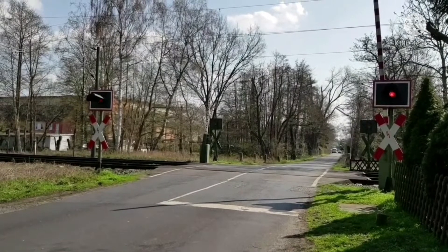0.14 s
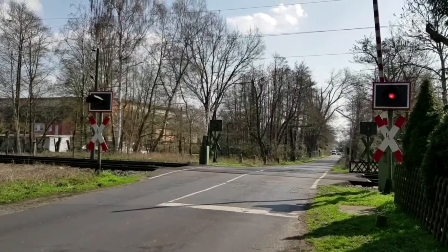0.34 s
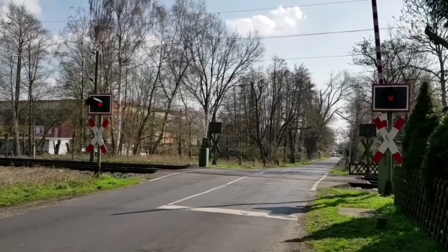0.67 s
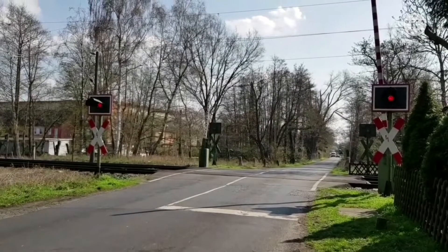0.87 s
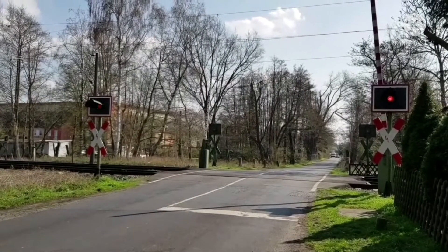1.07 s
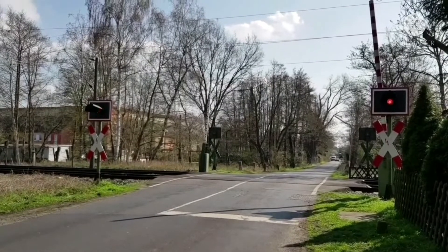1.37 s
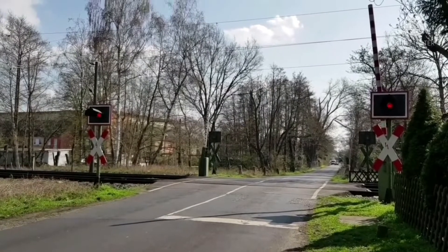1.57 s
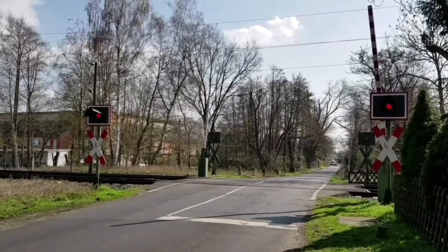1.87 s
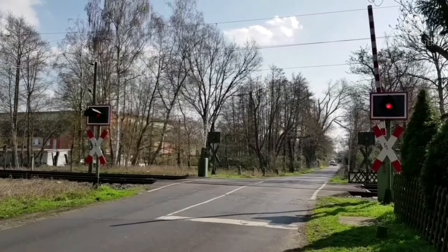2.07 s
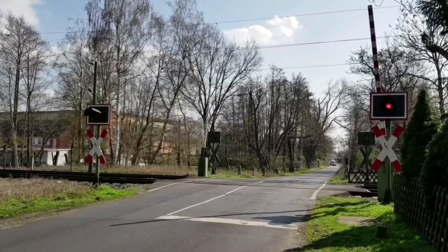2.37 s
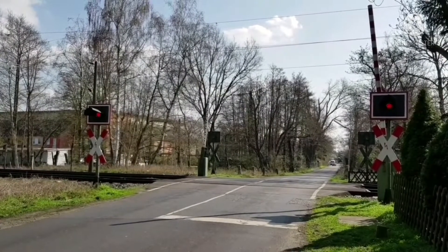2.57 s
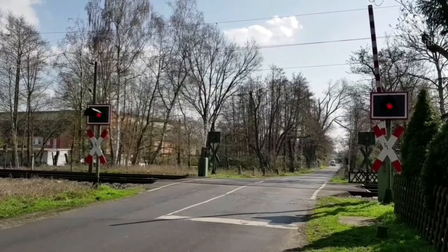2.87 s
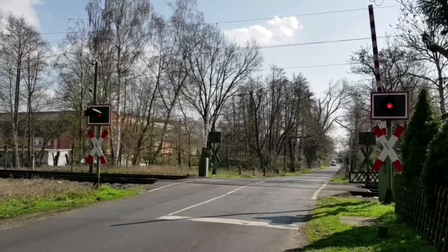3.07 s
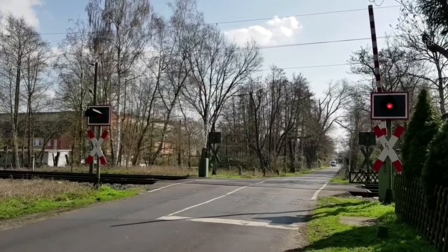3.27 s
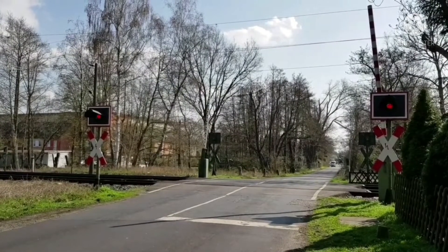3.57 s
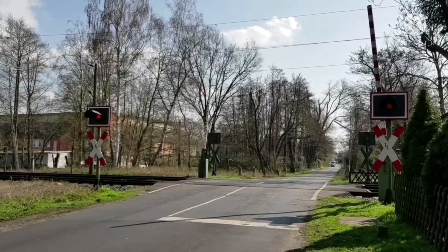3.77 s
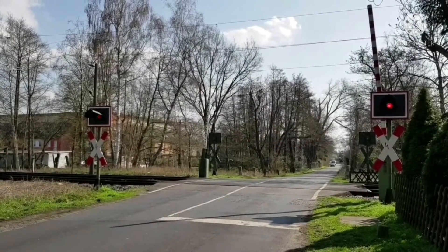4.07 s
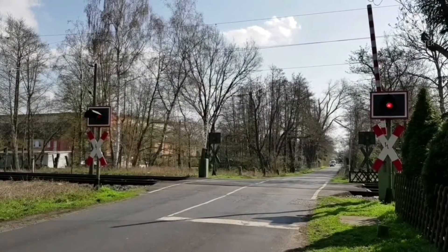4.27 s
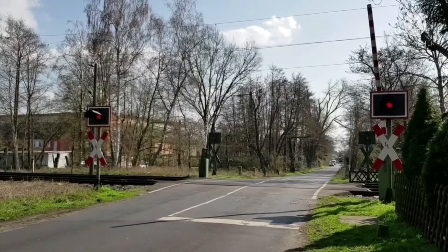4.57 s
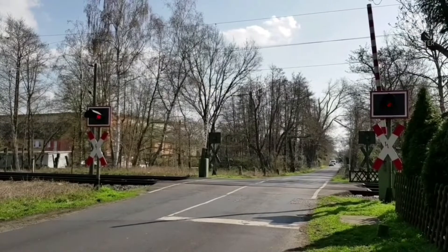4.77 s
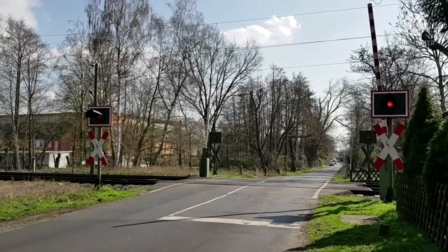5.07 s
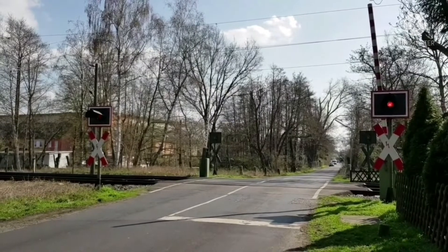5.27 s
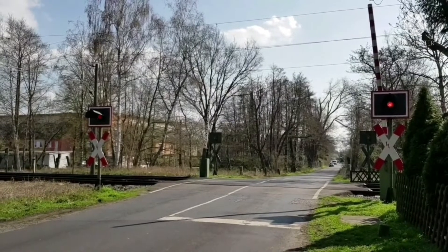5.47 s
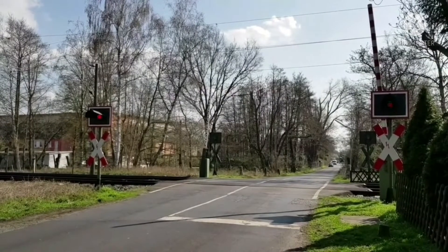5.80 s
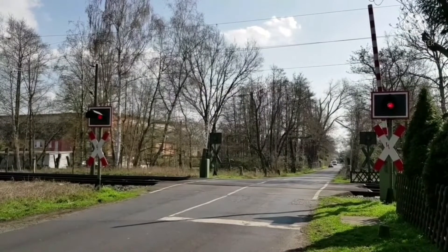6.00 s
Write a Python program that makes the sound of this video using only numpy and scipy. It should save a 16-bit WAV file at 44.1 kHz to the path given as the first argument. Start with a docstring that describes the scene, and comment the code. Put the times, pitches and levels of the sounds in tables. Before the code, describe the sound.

A hand-held stereo camera catches a quiet roadside among trees. A hard plastic knock comes almost at once over a departing car's deep drone and road noise. A bird steps down in high slurs, then a warbler alternates swooping syllables. Midway come clicks, grip bumps and brief finger rubbing as the engine drops away; birdsong and faint hiss continue, broken by another loud knock and a lighter one.

```python
"""A car's engine drones and dies away at a country level crossing, while its road noise recedes.
The engine is a few gliding harmonics; tyres, breeze and hiss are coloured stereo noise.
Close, dry knocks and clicks ring the modes of a hand-held camera's case, and fingers rub it.
Songbirds call from the trees as gliding tones, echoed by a house front and the wood."""
import sys
import numpy as np
from scipy import signal
from scipy.io import wavfile
from scipy.ndimage import uniform_filter1d

SR = 44100
rng = np.random.default_rng(int(sys.argv[2]) if len(sys.argv) > 2 else 0)


def waveform_to_disk(signal):
    """Save audio, clipped to [-1, 1], as 16-bit WAV at the path in sys.argv[1]."""
    frames = np.transpose(np.atleast_2d(signal))
    scaled = np.clip(frames, -1, 1) * 32767
    samples = np.round(scaled).astype(np.int16)
    wavfile.write(sys.argv[1], SR, samples)


N = 270765
TIME = np.arange(N) / SR
FRAME = 2048  # noise frame, samples

# Levels are relative where a layer adds its own trim. Pan is left minus right.
# engine before its run-down: t/s, firing rate f/Hz, firing tone level/dB before trim
ENGINE_RUN = [(0.0, 61.5, -46.5), (0.12, 61.2, -37.5), (0.16, 60.5, -50.5), (0.47, 61.64, -45),
              (0.61, 59.8, -42.5), (0.92, 59.98, -44), (1.26, 55.97, -41), (1.54, 55.44, -40),
              (2.35, 56.06, -44), (2.56, 53.15, -38), (3.26, 52.88, -45), (3.55, 53.9, -42)]
# exhaust harmonics: multiple of the firing rate, relative level/dB
EXHAUST_ORDERS = [(1, 0.5), (2, -11.5), (3, -24), (4, -24.5)]
# shared level of the harmonics above the firing tone: t/s, added level/dB
OVERTONE_LEVEL = [(0, 2), (.6, 3), (1.2, 2), (2.2, 0.8), (2.7, -7.5), (3.5, 6)]
# car on the road, before trim: t/s, body rumble level/dB, tyre roar level/dB
ROAD_LEVELS = [(0.0, -53.5, -58.5), (0.61, -52.5, -60), (1.13, -52.5, -58.5), (1.81, -55, -62),
               (3.54, -57, -62.5), (3.85, -62.5, -65.5), (4.7, -61.5, -65.5), (6.14, -65, -64.5)]
# colour of the body rumble: f/Hz, relative density/dB
RUMBLE_COLOUR = [(28, 0), (42, 3), (85, 5.5), (140, 1), (230, 0.5), (320, -1.5), (430, -11.5), (600, -11),
                 (1200, -70)]
# colour of the tyre roar: f/Hz, relative density/dB
TYRE_COLOUR = [(200, -3), (400, -4.5), (560, -4), (730, 2.5), (880, -2.5), (1100, -2.5), (1400, -8),
               (1650, -12.5), (2000, -17), (2600, -21), (3400, -33.5), (7000, -69)]

# knocks on the case: t/s, peak level/dB before pan, pan/dB, contact sharpness f/Hz, ring length factor
CASE_KNOCKS = [(0.1593, -14.5, 10.5, 1140, 1.2), (0.4357, -30, 9.5, 1929, 0.6),
               (0.8769, -38.5, -2, 1400, 0.54), (3.4449, -40, -18, 1130, 0.46),
               (3.4512, -38, -10, 722, 1.9), (3.572, -30, 12, 770, 1), (3.661, -40.5, -6, 835, 0.96),
               (4.598, -12.5, 10, 2170, 1.3), (5.2929, -34.5, 19, 880, 1.24)]
# soft bumps of the grip: t/s, starting level/dB, f/Hz, t60/s
GRIP_BUMPS = [(3.448, -50, 176, 0.11), (3.663, -37.5, 47.2, 0.11), (3.662, -41, 125, .05),
              (4.063, -41, 47, 0.15), (5.306, -34, 64, 0.086)]
# ringing modes of the case: left f/Hz, relative level/dB, t60/s before the length factor, signed right gain
CASE_MODES = [(211, -11, 0.13, 0.56), (295, 1, 0.034, 0.81), (368, 6.5, 0.024, -0.59),
              (523, -6.5, 0.02, -0.38), (713, 0.2, 0.019, 0.68), (947, -5, 0.027, -0.45),
              (1140, -7.5, 0.011, 1.8), (1770, -6.5, 0.015, -0.44), (2291, -17, 0.011, 0.8),
              (3900, -16, 0.023, -0.087), (5200, -8, 0.013, 0.58), (6160, 0, 0.0098, -0.21)]
# clicks of a plastic catch: t/s, peak level/dB before pan, pan/dB, contact sharpness f/Hz, ring length factor
CATCH_CLICKS = [(.4252, -37, -10, 1686, 1.3), (.4353, -35.5, 6, 1390, 1.2), (.4720, -43, 14, 5040, 0.37),
                (3.4436, -47.5, -17, 7110, 0.69), (3.5716, -20, 8.5, 7830, 1.7),
                (5.2922, -49.5, 15, 3690, 2)]
# ringing modes of the catch: left f/Hz, relative level/dB, t60/s before the length factor, signed right gain
CATCH_MODES = [(1060, -8.5, 0.032, 0.91), (1670, 6.5, 0.0057, -1.24), (2260, 11, 0.0039, 1),
               (2980, 0, 0.0066, -0.57), (4020, 2, 0.0099, -0.32), (6580, 14, 0.0068, -0.64),
               (9900, 6, 0.007, -0.26)]
# fingers rubbing the case: t/s, level/dB
FINGER_RUBS = [(3.447, -57), (3.578, -59)]
# colour of the rubbing: f/Hz, relative density/dB
RUB_COLOUR = [(450, 10), (950, -1), (3000, 2.5), (4000, -6), (6200, 4), (8000, -24)]

# the warbler's low syllable: t/s, length/s, pitch f/Hz, level/dB, echo level/dB relative to the note, pan/dB
LOW_NOTES = [(2.566, 0.09, 3860, -68.5, 4, 3), (3.407, 0.073, 3862, -69, -2, 5),
             (3.700, 0.081, 3820, -64, 5.5, 1.5), (4.753, 0.068, 3790, -68, 12, 2.5)]
# the warbler's high syllable: t/s, length/s, pitch f/Hz, level/dB, echo level/dB relative to the note, pan/dB
HIGH_NOTES = [(2.956, 0.081, 4920, -63.5, 2.5, -1), (4.088, 0.08, 4960, -56.5, -3, 0),
              (5.133, .082, 4870, -63, -2, 0.29)]
# the warbler's top syllable: t/s, length/s, pitch f/Hz, level/dB, echo level/dB relative to the note, pan/dB
TOP_NOTES = [(3.303, .062, 5390, -57.5, -8, -1), (4.391, 0.058, 5290, -55, -1, -0.5)]
# a far bird's rising whistles: t/s, pitch f/Hz, level/dB
FAR_WHISTLES = [(0.191, 2536, -71.5), (.722, 2659, -74.5), (1.235, 2600, -73), (1.825, 2645, -73),
                (2.336, 2630, -69.5), (2.888, 2710, -76.5), (3.534, 2720, -73), (4.421, 2550, -70.5),
                (5.041, 2700, -71), (5.588, 2670, -70)]
# another bird's thin, swelling notes: t/s, length/s, level/dB
FAR_PIPES = [(2.632, .13, -77), (2.989, 0.2, -74.5), (3.426, 0.146, -71), (3.822, 0.15, -71.5),
             (4.274, 0.14, -73.5)]
# faint chirps, and (4.922 s) a late echo of the warbler's low syllable: t/s, pitch f/Hz, level/dB
FAINT_NOTES = [(0.271, 4600, -85), (1.04, 6200, -87), (1.32, 4760, -77), (2.221, 5490, -79),
               (2.289, 4620, -79), (4.53, 3700, -79), (4.922, 3850, -78)]
# bursts of twitter deep in the wood: t/s, length/s, centre pitch f/Hz, level/dB
TWITTER_BURSTS = [(0.154, 0.084, 6330, -85.5), (2.632, 0.16, 5790, -82.5)]
# falling slur: share of the note, pitch ratio, loudness (0-1)
SLUR_SHAPE = [(0, 1.1, 0), (.14, 1.07, .75), (.5, 1.005, 1), (.78, .935, 1), (1, .8, .05)]
# rising whistle: share of the note, pitch ratio, loudness (0-1)
WHISTLE_SHAPE = [(0, .86, 0), (.2, .945, .8), (.5, 1.03, 1), (.82, 1.088, .9), (1, 1.095, 0)]
# nearly level, swelling pipe: share of the note, pitch ratio, loudness (0-1)
PIPE_SHAPE = [(0, 1.003, 0), (.12, 1, .5), (.45, 1, 1), (.85, 1, .9), (1, .997, 0)]
# slightly falling faint note: share of the note, pitch ratio, loudness (0-1)
FAINT_SHAPE = [(0, 1.02, 0), (.3, 1.005, 1), (.6, .99, .8), (1, .97, 0)]
# low syllable, a deep swoop: share of the note, pitch ratio, loudness (0-1)
LOW_SHAPE = [(0, 1.85, 0), (.06, 1.68, .22), (.17, 1.16, .45), (.29, 1.03, .6), (.6, .997, 1),
             (.8, .995, .8), (1, .95, 0)]
# high syllable, a shallower swoop: share of the note, pitch ratio, loudness (0-1)
HIGH_SHAPE = [(0, 1.48, 0), (.07, 1.32, .16), (.17, 1.08, .33), (.28, 1.01, .7), (.58, .995, 1),
              (.86, .935, 1), (1, .9, 0)]
# top syllable, a swoop and late drop: share of the note, pitch ratio, loudness (0-1)
TOP_SHAPE = [(0, 1.39, 0), (.08, 1.27, .25), (.2, 1.07, .45), (.34, 1, .9), (.5, 1, 1), (.78, 1, 1),
             (.88, .93, .2), (1, .8, .08)]

# colour of the breeze: f/Hz, relative density/dB
BREEZE_COLOUR = [(22, -38), (33, -29), (44, 22.5), (70, 11), (110, -16), (250, -31)]
# colour of the hiss: f/Hz, relative density/dB
HISS_COLOUR = [(1500, -4.5), (2600, 0.5), (3400, 3), (4500, -3.5), (6300, -7.5), (7300, -1), (8300, -41),
               (10000, -7), (12500, 1), (14500, -3)]
# likeness of left and right in every noise: f/Hz, coherence (0-1)
STEREO_LIKENESS = [(60, 0.76), (130, 0.81), (290, 0.9), (630, 0.51), (1380, 0.027), (3000, 0.013)]
# far-off ringing: t/s, gain; then f/Hz, relative density/dB
RING_SWELL = [(2.5, 0.37), (4.25, 1), (4.9, 0.94), (5.2, 0.53)]
RING_COLOUR = [(1300, -47), (1520, 1.0), (1620, -1.0), (1720, -1.5), (2000, -40.0)]
# haze of birdsong: t/s, gain; then f/Hz, relative density/dB
CHORUS_SWELL = [(0, 0.93), (3.5, 1), (5.5, 0.42)]
CHORUS_COLOUR = [(2800, -25), (4000, -2.0), (5600, 0.0), (6800, -7.0), (8000, -46)]

# the engine runs down, sagging steadily and fading ever faster
RUN_DOWN_AT_S, SAG_HZ_PER_S, FADE_DB_PER_S2 = 3.53, 33, 390
# after each knock the case settles with a weaker, duller, longer blow
REBOUND_S, REBOUND_DB, REBOUND_HZ, REBOUND_RING = 0.0118, -18.5, 450, 1.7
# falling series: each slur is lower, longer, louder and further right than the last
SERIES_AT_S, SLUR_GAP_S = 1.183, 0.118
SLUR_HZ, SLUR_STEP_HZ, SLUR_S, SLUR_STEP_S = 6837, -320, 0.052, 0.013
SLUR_DB, SLUR_STEP_DB, SLUR_PAN_DB, SLUR_PAN_STEP_DB = -57, 1.83, 8.5, -2
# what the notes of each far layer share
WHISTLE_S, WHISTLE_ECHO_DB, WHISTLE_PAN_DB = 0.105, -12.5, -4.5
PIPE_HZ, PIPE_ECHO_DB, PIPE_PAN_DB = 3983, -10.5, 7
FAINT_S, FAINT_ECHO_DB, FAINT_PAN_DB = 0.0906, -14, 3
WALL_DULL_HZ = 5600
TWIG_TILT_DB_PER_OCTAVE = 19
TOP_HZ = 14550


def undb(db):
    """Decibels to gain."""
    return 10 ** (np.asarray(db) / 20)


def unit(x):
    """Scale to rms 1."""
    return x / np.sqrt(np.mean(x ** 2))


def curve(table, at=TIME):
    """Each column of a table, joined by straight lines."""
    s, *columns = np.transpose(table)
    return [np.interp(at, s, column) for column in columns]


def colour(table, hz):
    """Read (f/Hz, value) points on a log-frequency axis."""
    f, value = np.transpose(table)
    return np.interp(np.log(hz + 1), np.log(f), value)


def walk(rate):
    """Smooth random drift of rms 1, from about rate random points a second."""
    return unit(signal.resample(rng.standard_normal(int(rate * N / SR) + 2), N))


def add(out, s, sound, pan_db):
    """Mix a sound in at a time and a place between left and right."""
    i = int(s * SR)
    sides = undb(np.array([[pan_db], [-pan_db]]) / 2)
    out[:, i:i + sound.shape[-1]] += (sides * sound)[:, :N - i]


def wash(spectrum, flicker_db):
    """Coloured stereo noise: time-frequency patches flicker, and the bass is alike on both sides."""
    hz = np.fft.rfftfreq(FRAME, 1 / SR)
    shape = (len(hz), 2 * N // FRAME + 3)
    mid, side = rng.standard_normal((2, *shape)) + 1j * rng.standard_normal((2, *shape))
    alike = np.clip(colour(STEREO_LIKENESS, hz), 0, 1)[:, None]
    patches = uniform_filter1d(rng.standard_normal(shape), size=12, axis=0)
    patches = unit(uniform_filter1d(patches, size=4, axis=1))
    gain = undb(colour(spectrum, hz)[:, None] + flicker_db * patches)
    # more sum than difference makes the sides coherent
    mid = signal.istft(mid * np.sqrt(1 + alike) * gain)[1][:N]
    side = signal.istft(side * np.sqrt(1 - alike) * gain)[1][:N]
    return np.array([mid + side, mid - side]) / np.std(mid)


def engine(flutter=0.014, uneven_db=2.0, trim_db=-1.5):
    """Muffled exhaust: a strong firing tone with weaker, unsteady overtones, dying away at the end."""
    hz, db = curve(ENGINE_RUN)
    dying = np.maximum(TIME - RUN_DOWN_AT_S, 0)
    hz = np.maximum(hz - SAG_HZ_PER_S * dying, 0)
    db = db + trim_db - FADE_DB_PER_S2 * dying ** 2
    phase = 2 * np.pi * np.cumsum(hz * (1 + flutter * walk(25))) / SR
    overtones, = curve(OVERTONE_LEVEL)
    tone = np.zeros(N)
    for order, order_db in EXHAUST_ORDERS:
        # zero for the firing tone, one for the overtones
        is_overtone = min(abs(order - 1), 1)
        order_level = order_db + is_overtone * (overtones + uneven_db * walk(9.07))
        tone += undb(order_level) * np.sin(order * phase)
    return np.sqrt(2) * tone * undb(db)


def road(rumble_db=4, tyre_db=2):
    """Body rumble and tyre roar of the receding car, as two bands of noise on falling faders."""
    rumble, roar = curve(ROAD_LEVELS)
    body = undb(rumble + rumble_db) * wash(RUMBLE_COLOUR, flicker_db=2.5)
    tyres = undb(roar + tyre_db) * wash(TYRE_COLOUR, flicker_db=1.5)
    return body + tyres


def strikes(hits, modes, right_tune, crack_db, crack_t60):
    """Blows ring a small plastic body; the right microphone hears each mode lower, with its own gain and sign."""
    out, t = np.zeros((2, N)), np.arange(SR // 4) / SR
    tune = np.array([[1], [right_tune]])
    muffle = signal.butter(6, 7000, fs=SR, output="sos")
    for s, db, pan_db, sharp_hz, length in hits:
        ring = np.zeros((2, len(t)))
        for hz, mode_db, t60, right in modes:
            decay = undb(mode_db - 60 * t / (t60 * length))
            ring += np.array([[1], [right]]) * decay * np.sin(2 * np.pi * hz * tune * t)
        crack = undb(crack_db - 60 * t / (crack_t60 * length)) * rng.standard_normal((2, len(t)))
        raw = ring + crack
        # a softer contact pushes for longer and dulls the blow
        contact = signal.butter(2, min(sharp_hz, SR / 3), fs=SR, output="sos")
        blow = signal.sosfilt(contact, raw) + 0.045 * raw
        # the body lets less through above 7 kHz
        blow = signal.sosfilt(muffle, blow) + 0.14 * blow
        peak = np.abs(blow).max(axis=1, keepdims=True)
        add(out, s, -undb(db) * blow / peak, pan_db)
    return out


def handling():
    """Knocks with their rebounds, catch clicks, and soft low bumps of the hand as decaying sines."""
    rebounds = [(s + REBOUND_S, db + REBOUND_DB, pan_db, REBOUND_HZ, length * REBOUND_RING)
                for s, db, pan_db, _, length in CASE_KNOCKS]
    out = strikes(CASE_KNOCKS + rebounds, CASE_MODES, right_tune=0.908, crack_db=-22, crack_t60=0.22)
    out += strikes(CATCH_CLICKS, CATCH_MODES, right_tune=0.87, crack_db=-1, crack_t60=0.02)
    t = np.arange(SR // 2) / SR
    for s, db, hz, t60 in GRIP_BUMPS:
        add(out, s, undb(db - 60 * t / t60) * np.sin(2 * np.pi * hz * t), 0)
    return out


def rubbing(attack_s=0.0066, t60=0.31):
    """Fingers slide briefly over the case as the grip shifts: quick-rising, decaying noise."""
    level = np.zeros(N)
    for s, db in FINGER_RUBS:
        since = np.maximum(TIME - s, 0)
        level += np.minimum(since / attack_s, 1) * undb(db - 60 * since / t60)
    return level * wash(RUB_COLOUR, flicker_db=5)


def scatter(sound, t60, build_s=0.00063):
    """Dense faint reflections, different for each side, that build up and decay at the t60 rate."""
    t = np.arange(SR) / SR
    tail = rng.standard_normal((2, SR)) * np.minimum(t / build_s, 1) * undb(-60 * t / t60)
    tail /= np.sqrt(np.sum(tail ** 2, axis=1, keepdims=True))
    return signal.fftconvolve(sound, tail, axes=1)[:, :N]


def bird(notes, shape, echo_s, twig_db, wood_db, wood_t60, waver, shimmer_db):
    """Gliding, unsteady notes; a house front slaps them back dully, twigs and wood scatter their highest parts."""
    out, scattered = np.zeros((2, 2, N))
    for s, length, hz, db, echo_db, pan_db in notes:
        n = int(length * SR)
        ratio, loud = curve(shape, np.linspace(0, 1, n))
        tremble, shimmer = rng.standard_normal((2, SR // 2))
        tremble = unit(uniform_filter1d(tremble, size=120))[:n]
        shimmer = unit(uniform_filter1d(uniform_filter1d(shimmer, size=400), size=300))[:n]
        phase = 2 * np.pi * np.cumsum(hz * ratio * (1 + waver * tremble)) / SR
        # at these short wavelengths the two microphones are about a quarter cycle apart
        pair = np.sqrt(2) * np.array([np.sin(phase), np.cos(phase)])
        note = undb(db + shimmer_db * shimmer) * loud * pair
        dull = np.minimum(max(WALL_DULL_HZ, hz) / (hz * ratio), 1) ** 4
        echo = note * dull * undb(echo_db)
        bright = undb(TWIG_TILT_DB_PER_OCTAVE * np.log2(ratio))
        for at, sound in (s, note), (s + echo_s, echo):
            add(out, at, sound, pan_db)
            add(scattered, at, sound * bright, pan_db)
    twigs = undb(twig_db) * scatter(scattered, t60=0.085)
    wood = undb(wood_db) * scatter(scattered, wood_t60, build_s=echo_s / 2)
    return out + twigs + wood


def falling_series(count=4, echo_db=-11.0):
    """A near bird steps down through a few high slurs, each one a downward glide."""
    notes = [(SERIES_AT_S + k * SLUR_GAP_S, SLUR_S + k * SLUR_STEP_S, SLUR_HZ + k * SLUR_STEP_HZ,
              SLUR_DB + k * SLUR_STEP_DB, echo_db, SLUR_PAN_DB + k * SLUR_PAN_STEP_DB)
             for k in range(count)]
    return bird(notes, SLUR_SHAPE, echo_s=0.048, twig_db=-3, wood_db=-2.5, wood_t60=0.36,
                waver=0.011, shimmer_db=2)


def warbler():
    """A warbler see-saws between three syllables, each swooping down onto a held pitch."""
    low = bird(LOW_NOTES, LOW_SHAPE, echo_s=0.061, twig_db=-8, wood_db=-8, wood_t60=0.33,
               waver=0.009, shimmer_db=2.5)
    high = bird(HIGH_NOTES, HIGH_SHAPE, echo_s=0.058, twig_db=-6, wood_db=-6.5, wood_t60=0.3,
                waver=0.01, shimmer_db=2.5)
    top = bird(TOP_NOTES, TOP_SHAPE, echo_s=0.054, twig_db=-6, wood_db=-4, wood_t60=0.33,
               waver=0.003, shimmer_db=1.5)
    return low + high + top


def twitter(spread, gap_s=0.0026, note_s=0.012, echo_db=-18, pan_db=7):
    """Quick, tiny, overlapping notes scattered about the pitch of each burst."""
    return [(s + at, note_s, hz * (1 + spread * rng.standard_normal()), db, echo_db, pan_db)
            for s, length, hz, db in TWITTER_BURSTS
            for at in np.arange(0, length, gap_s)]


def far_birds():
    """Rising whistles, thin pipes, twitter, faint chirps and a late echo of the warbler's low syllable."""
    rising = [(s, WHISTLE_S, hz, db, WHISTLE_ECHO_DB, WHISTLE_PAN_DB) for s, hz, db in FAR_WHISTLES]
    thin = [(s, length, PIPE_HZ, db, PIPE_ECHO_DB, PIPE_PAN_DB) for s, length, db in FAR_PIPES]
    short = [(s, FAINT_S, hz, db, FAINT_ECHO_DB, FAINT_PAN_DB) for s, hz, db in FAINT_NOTES]
    whistles = bird(rising, WHISTLE_SHAPE, echo_s=0.085, twig_db=-12, wood_db=-1, wood_t60=0.8,
                    waver=0.005, shimmer_db=1.5)
    pipes = bird(thin, PIPE_SHAPE, echo_s=0.048, twig_db=-2.0, wood_db=-7.5, wood_t60=0.75,
                 waver=0.0059, shimmer_db=2.0)
    faint = bird(short, FAINT_SHAPE, echo_s=0.05, twig_db=-3, wood_db=0, wood_t60=0.45,
                 waver=0.008, shimmer_db=3)
    deep = bird(twitter(spread=0.08), PIPE_SHAPE, echo_s=0.1, twig_db=2, wood_db=3, wood_t60=0.35,
                waver=0.029, shimmer_db=1.5)
    return whistles + pipes + faint + deep


def birds():
    """All the separate bird calls in the trees, near to far."""
    return falling_series() + warbler() + far_birds()


def outdoors(breeze_db=-62, gust_db=-0.5, air_db=-79, far_ring_db=-71, chorus_db=-82):
    """Noise beds: a breeze at the microphone, hiss, a haze of far birdsong, a far-off ringing that swells once."""
    breeze = undb(breeze_db + gust_db * walk(3.2)) * wash(BREEZE_COLOUR, flicker_db=0.5)
    ring_swell, = curve(RING_SWELL)
    ring = ring_swell * wash(RING_COLOUR, flicker_db=3.5)
    chorus_swell, = curve(CHORUS_SWELL)
    chorus = chorus_swell * wash(CHORUS_COLOUR, flicker_db=1.0)
    hiss = wash(HISS_COLOUR, flicker_db=1.2)
    return breeze + undb(air_db) * hiss + undb(far_ring_db) * ring + undb(chorus_db) * chorus


def scene():
    """Everything that reaches the camera, summed."""
    return engine() + road() + handling() + rubbing() + birds() + outdoors()


def record(dry):
    """The camera cuts the deepest bass below 35 Hz and the top above TOP_HZ."""
    thinned = signal.sosfilt(signal.butter(6, 35, "high", fs=SR, output="sos"), dry)
    return signal.sosfilt(signal.ellip(10, 0.2, 80, TOP_HZ, fs=SR, output="sos"), thinned)


dry = scene()
out = record(dry)
waveform_to_disk(out)
```